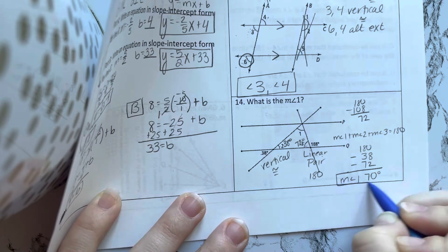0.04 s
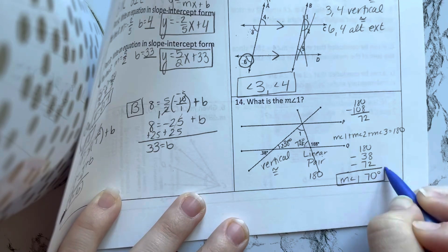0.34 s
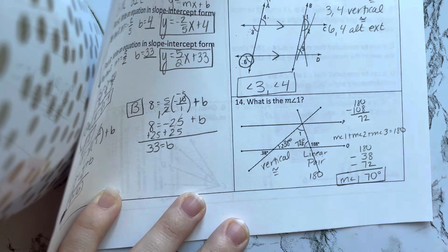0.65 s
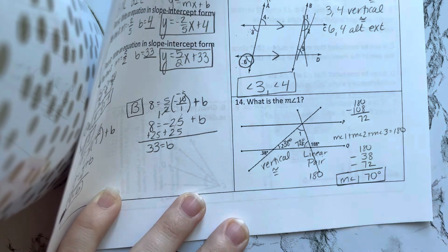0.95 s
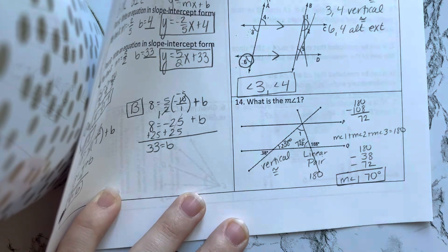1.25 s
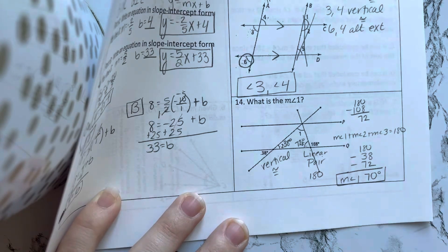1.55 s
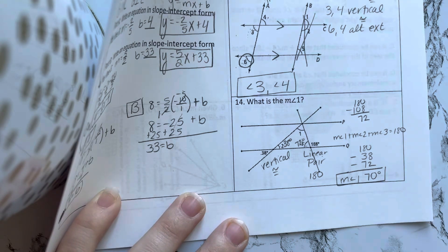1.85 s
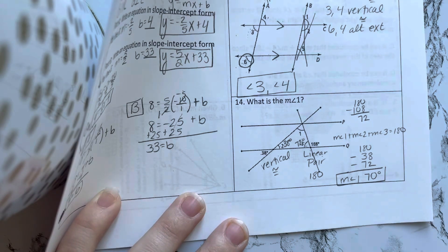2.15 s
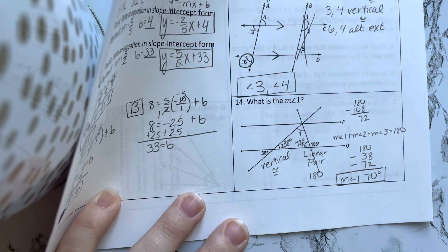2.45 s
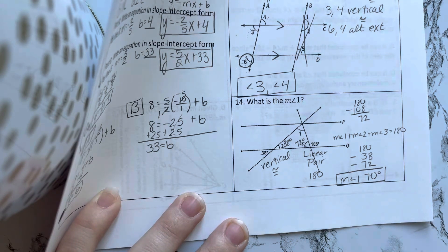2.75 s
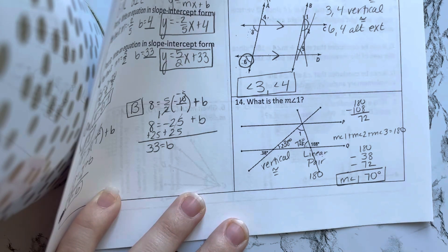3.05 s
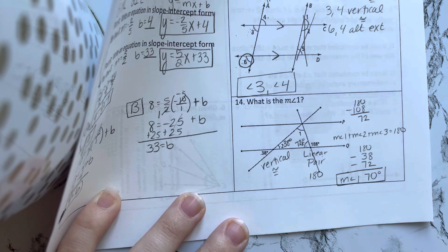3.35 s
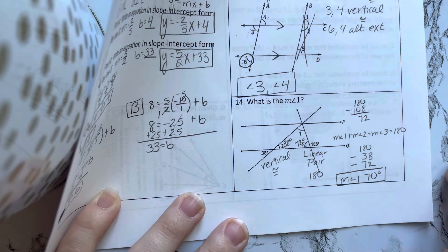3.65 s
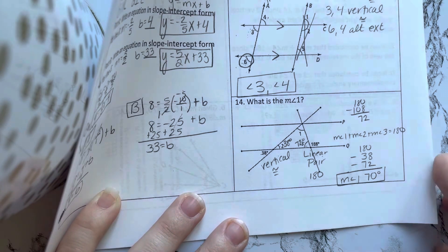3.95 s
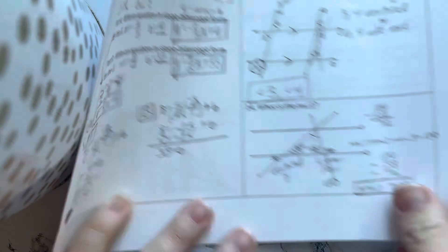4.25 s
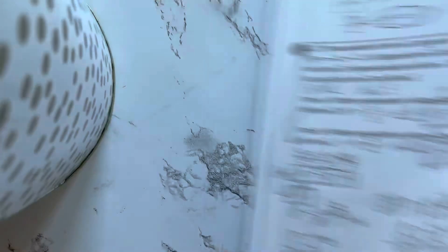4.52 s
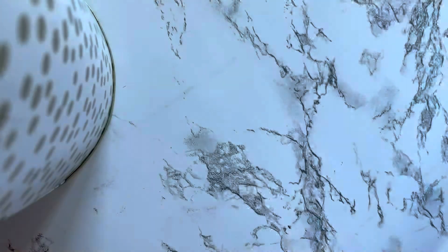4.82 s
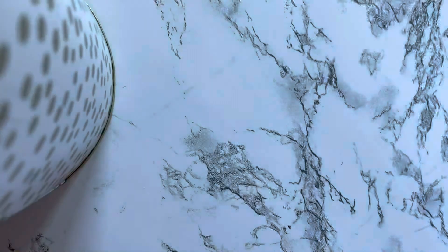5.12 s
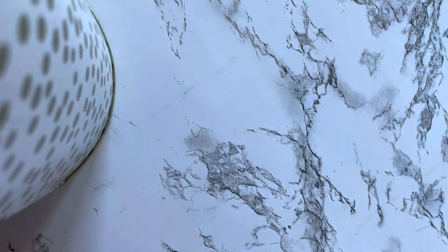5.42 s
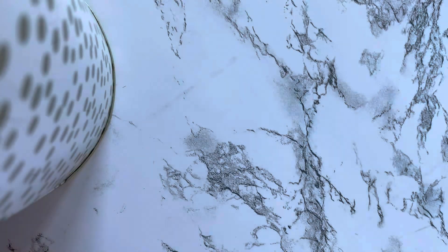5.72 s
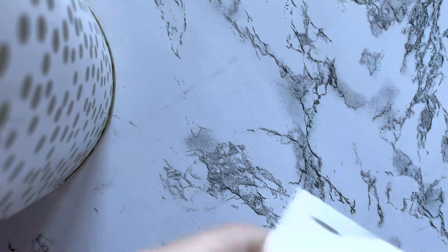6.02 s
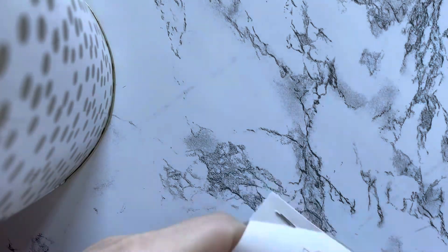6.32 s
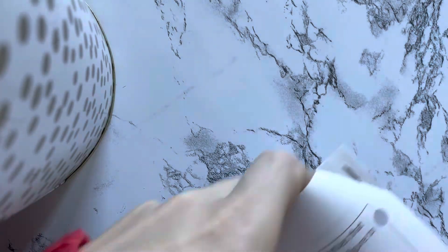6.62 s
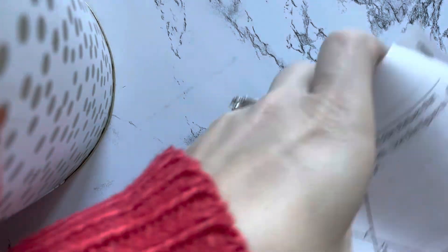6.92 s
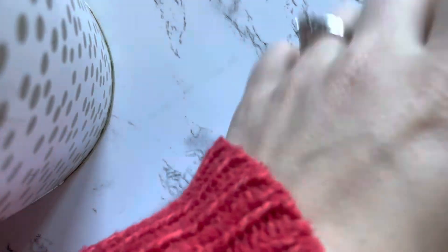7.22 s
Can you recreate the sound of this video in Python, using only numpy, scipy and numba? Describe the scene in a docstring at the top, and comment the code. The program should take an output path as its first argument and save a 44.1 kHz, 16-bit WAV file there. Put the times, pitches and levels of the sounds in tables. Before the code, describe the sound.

A pen makes two short, faint scratches on paper. Fingers then brush softly over the page, with a few tiny ticks. About halfway through, the sheet is slid off and turned over, rustling, flapping and crackling with soft puffs of air. It is pushed back across a stone table with a hiss and a brief low buzz, ending in a sharp snap. The sound is close, in a quiet room with a low rumble.

```python
"""Turning a worksheet on a stone table

A pen makes two last strokes and fingers brush faintly over the page: both are stick-slip friction.
The sheet is slid off, lifted, turned over and pushed back: it rubs, bends, buckles with sharp snaps
and displaces air. It is heard close by and in stereo, in a quiet room over a low rumble."""
import sys
import numpy as np
from scipy import signal
from scipy.fft import rfft, irfft, next_fast_len
from scipy.io import wavfile
from scipy.ndimage import uniform_filter1d
from numba import njit

SR = 44100
rng = np.random.default_rng(int(sys.argv[2]) if len(sys.argv) > 2 else 0)


def digitize_waveform(pressure):
    """Quantize a signal to 16-bit integers and store it at the path in sys.argv[1].

    Rows of a 2-D input are taken as channels; values are limited to [-1, 1].
    """
    field = np.atleast_2d(pressure).T
    bounded = np.clip(field, -1, 1)
    quanta = np.round(bounded * 32767).astype(np.int16)
    wavfile.write(sys.argv[1], SR, quanta)


N = 324983

# Buckles of the sheet. Each row: time in seconds, relative level in dB, crack and thud offsets in dB,
# relative level of the crumpling that follows in dB, its t60 in seconds, ring frequency in Hz.
BUCKLES = [(4.003, -40, -4.5, -33, -54, .08, 2120), (4.079, -33, -5, -21.5, -69, 0.18, 3500),
           (4.196, -31.5, -17, -31, -60, .08, 1940), (4.229, -22, -21, -26.5, -50, .2, 1800),
           (4.4664, -21.5, -9, -12, -37, 0.16, 2280), (4.496, -27.5, -17, -1, -35, 0.067, 950),
           (4.574, -29.5, -18, -19, -35.5, 0.092, 1140), (4.823, -45, -14, -22, -72, 0.025, 5230),
           (4.922, -50, -7, -10, -74, .05, 4770), (4.97, -29, -4.5, -4.5, -45.5, 0.18, 770),
           (5.044, -20.5, -17, -8, -47, .11, 1130), (5.082, -30, -4.5, -26, -58, .06, 2640),
           (5.11, -27, -32, -32, -28, 0.058, 2440), (5.157, -33, -18, -9, -66, 0.056, 1280),
           (5.219, -24, -8, -11, -41, 0.14, 1400), (5.24, -26.5, -30, -18, -48, .08, 1460),
           (5.298, -47, -5, -12, -64, .05, 2000), (5.373, -34, -9.5, -6, -47.5, 0.13, 1510),
           (5.412, -37, -33, -11, -40, 0.12, 1330), (5.5, -27, -32, -13.5, -35, 0.088, 1180),
           (5.538, -21, -32, -21, -35, 0.05, 1580), (5.566, -25.5, -32, -32, -42.5, 0.063, 1650),
           (5.605, -43, -33, -30, -39, .09, 1440), (5.757, -37.5, -30, -21, -40.5, 0.12, 2200),
           (5.831, -32, -22, -27, -41.5, .1, 1610), (5.895, -33, -13, -21, -45.5, 0.13, 2840),
           (5.912, -39.5, -3, -4.5, -53, 0.11, 2280), (5.984, -37.5, -8, -30, -40, 0.095, 1990),
           (6.049, -38.5, 0.5, -13, -39.5, 0.073, 1620), (6.265, -32.5, -26, -5.5, -39.5, 0.1, 1040),
           (6.554, -33, -25, -18, -48, .05, 2020), (6.567, -26, -27, -15.5, -41.5, 0.067, 1350),
           (6.613, -21, -33, -19, -35, 0.068, 2420), (6.665, -29.5, -12, -9.5, -45, 0.096, 1650),
           (6.833, -26, -31, -9.5, -49, 0.11, 2670), (6.892, -29, -16, -17, -38.5, 0.068, 1590),
           (7.013, -26, -24, -34, -49, 0.06, 1300), (7.135, -18.5, -10.5, -29, -33.5, 0.093, 1510),
           (7.176, -6, -11, -32, -43, 0.086, 1590), (7.197, -17.5, -29, -29, -52, 0.11, 1340)]
# Spectra of paper flexing, cracking and flapping. Each row: frequency in Hz, relative level in dB.
FLEX_SPECTRUM = [(250, -36.5), (450, -8.5), (700, 2.5), (1000, 0.5), (1400, 3.5), (1900, -7), (2600, -1.5),
                 (3300, -10), (5500, -26.5), (12000, -65)]
CRACK_SPECTRUM = [(1000, -12.5), (2300, 9), (4200, 13.5), (5600, 3), (8000, 8.5), (10500, 10), (12500, -9),
                  (15500, -10)]
FLAP_SPECTRUM = [(90, -0.5), (170, -1.5), (380, 0), (600, -4), (1100, -5.5)]


def buckling():
    """Snap-through releases elastic energy at once: a papery knock and ring, a crack and a low thud."""
    times, db, crack_db, thud_db, _, _, hz = np.transpose(BUCKLES)
    knock = colour(bursts(times, db + 6, after=0.085, t60=0.024), FLEX_SPECTRUM)
    ring = rings(times, db - 4, hz, width=700, after=0.16, t60=0.03)
    crack = colour(bursts(times, db + crack_db + 17.5, after=0.11, t60=0.012), CRACK_SPECTRUM)
    thud = colour(bursts(times, db + thud_db + 17, after=0.083, t60=0.21), FLAP_SPECTRUM)
    return knock + ring + crack + thud


def sliding():
    """Sliding friction hisses and crackles in short tugs and one long push, duller as the sheet recedes."""
    # Each row: start in seconds, length in seconds, relative level in dB, swish resonance in Hz.
    tugs = [(3.998, 0.12, -49, 3700), (4.04, 0.17, -51, 3380), (4.187, .15, -41, 3200),
            (4.296, 0.11, -46, 6800), (4.392, 0.078, -52.5, 4700), (4.463, 0.041, -42, 6250),
            (4.5, 0.12, -57, 2930), (4.58, 0.095, -51, 4560), (4.667, 0.096, -57, 3770),
            (4.715, 0.096, -51, 4900), (4.773, 0.2, -56.5, 6430), (4.96, 0.16, -53, 2450),
            (5.076, 0.13, -50.5, 3370), (5.197, 0.084, -50.5, 5600), (5.273, 0.16, -58, 3970),
            (6.245, 0.05, -45.5, 2700), (6.622, 0.071, -47, 3650), (6.895, 0.072, -45, 3760),
            (7.074, 0.045, -49, 2780), (7.111, 0.13, -43.5, 2580), (7.308, 0.11, -53, 2450)]
    # The push back across the table. Each row: time in seconds, relative level in dB.
    push = [(5.42, -82), (5.49, -61.5), (6.1, -50), (6.22, -52), (6.33, -57.5), (6.58, -54), (6.88, -48.5),
            (7.06, -58.5), (7.25, -57.5), (7.369, -54)]
    # Each row: frequency in Hz, relative level in dB.
    hiss_spectrum = [(600, -3.5), (900, -4), (1400, -2), (2100, 2), (3200, -1.5), (4500, -3), (5800, -4),
                     (7000, -2.5), (9300, 7.5), (11000, 3.5), (12000, 0.5), (13000, 6.5), (14300, -3),
                     (15500, -5)]
    # Each row: time in seconds, share of the hiss that is dulled, from 0 to 1.
    receding = [(4.3, 0.1), (4.5, 0.36), (6.5, 0.75)]
    friction = grains(5000, spread_db=0.5, clump_db=1.77, smooth=0.69)
    tugging = swish = 0
    for start, length, db, hz in tugs:
        tug = from_db(db) * stroke(start, length, skew=0.66, taper=1)
        tugging += tug
        swish += tug * rms_one(steep_band(friction, hz, width=hz / 1.77))
    motion = np.hypot(tugging, gains(push)[0])
    hiss = from_db(4.5) * colour(motion * friction, hiss_spectrum)
    crackles = colour(motion * grains(60, spread_db=4, clump_db=-1.5, smooth=0), CRACK_SPECTRUM)
    dulled = from_db(3) * signal.sosfiltfilt(signal.butter(2, 11500, fs=SR, output="sos"), hiss)
    away = in_time(receding)[0]
    return (1 - away) * hiss + away * dulled + from_db(-10) * swish + from_db(-9.5) * crackles


def bending():
    """Crumpling, in slow bends and after each buckle, excites the cavity of the curved sheet."""
    # Each row: start in seconds, length in seconds, relative level in dB, cavity resonance in Hz.
    slow_bends = [(4.198, 0.12, -47.5, 1800), (4.975, 0.12, -50.5, 1060), (5.073, 0.14, -36.5, 1440),
                  (5.349, 0.075, -51, 1210), (5.459, 0.25, -47, 1420), (5.68, 0.077, -41.5, 1340),
                  (6.065, 0.26, -50, 825), (6.228, 0.062, -47.5, 1124), (6.29, 0.52, -60.5, 1550),
                  (6.818, 0.16, -42.5, 1550), (7.222, 0.039, -39, 1500)]
    starts, lengths, db, bend_hz = np.transpose(slow_bends)
    times, _, _, _, fold_db, t60s, fold_hz = np.transpose(BUCKLES)
    bends = strokes(starts, lengths, from_db(db), skew=0.63, taper=1.21)
    folds = settling(times, from_db(fold_db), t60s)
    # The resonance follows an amplitude-weighted mean, so the strongest fold sets the pitch.
    weighted_bends = strokes(starts, lengths, from_db(db) * bend_hz, skew=0.63, taper=1.21)
    weighted_folds = settling(times, from_db(fold_db) * fold_hz, t60s)
    rest = 1e-6
    hz = (weighted_bends + weighted_folds + rest * np.median(fold_hz)) / (bends + folds + rest)
    hz *= np.exp(0.1 * drift(30) - 0.05)
    crumple = grains(1800, spread_db=4, clump_db=0.5, smooth=0.35)
    papery = evened(colour(crumple, FLEX_SPECTRUM), window_s=0.0099)
    hollow = (from_db(-1.5) * bends + folds) * cavity(crumple, hz, width=1130)
    return (from_db(-11.5) * bends + from_db(-2.5) * folds) * papery + hollow


def cavity(x, hz, width):
    """The hollow of a curved sheet acts as a gliding resonator; the output is held near unit rms."""
    turn = 2 * np.pi * hz / SR
    radius = np.exp(-np.pi * width / SR)
    rung = moving_band(moving_band(x, turn, radius), turn, radius)
    return evened(butterworth(rms_one(rung), 1, [500, 4500], "band"), window_s=0.0036)


def rustling():
    """Comb filtering: the moving sheet's sound interferes with its reflection from the table."""
    direct = sliding() + bending()
    n = np.arange(N)
    delay_s = 0.001193 * np.exp(0.449 * drift(2.797))
    reflection = np.interp(n - SR * delay_s, n, direct)
    return resonate(direct + 0.51 * reflection)


def swinging():
    """Air displacement: with each swing the leaf flutters and pushes out a low puff."""
    # Each row: start in seconds, length in seconds, flapping level in dB, puff level in dB.
    swings = [(4.039, 0.079, -53, -66), (4.144, 0.38, -58, -47), (4.367, 0.18, -54.5, -47),
              (4.463, 0.26, -44.5, -43.5), (4.76, 0.11, -52, -51), (4.972, 0.083, -37, -37),
              (5.053, 0.1, -38, -54), (5.125, 0.15, -40.5, -66), (5.317, 0.26, -45, -58),
              (5.51, 0.24, -45.5, -54), (5.647, 0.3, -46, -45.5), (5.918, 0.55, -49.5, -52),
              (6.235, 0.063, -49.5, -42), (6.257, 0.26, -85, -37), (6.483, 0.11, -50.5, -39.5),
              (6.643, 0.1, -71, -42.5), (6.797, 0.35, -51.5, -47), (7.105, 0.23, -41.5, -43)]
    # Each row: frequency in Hz, relative level in dB.
    air_spectrum = [(20, -26), (50, 0.5), (110, -6), (190, -19), (400, -42)]
    starts, lengths, flap_db, air_db = np.transpose(swings)
    flap, air = (strokes(starts, lengths, from_db(db), skew=0.66, taper=1) for db in (flap_db, air_db))
    flutter = colour(flap * grains(500, spread_db=2, clump_db=3.5, smooth=0.43), FLAP_SPECTRUM)
    return flutter + colour(air * rng.standard_normal(N), air_spectrum)


def clink(start_s=4.467):
    """Modal ringing: something small and hard is knocked as the sheet leaves."""
    # Each row: frequency in Hz, initial level in dB, t60 in seconds.
    modes = [(2230, -26.5, 0.024), (6800, -17.5, 0.015), (7570, -27, 0.022), (10670, -20, 0.011),
             (13900, -26, .015)]
    t = np.maximum(np.arange(N) / SR - start_s, 0)
    return sum(from_db(db - 60 * np.minimum(t / t60, 5)) * np.sin(2 * np.pi * hz * t)
               for hz, db, t60 in modes)


def buzz():
    """A fundamental and its octave shudder briefly, as of something rubbing on the table."""
    # Each row: time in seconds, fundamental in Hz, level in dB.
    shudder = [(6.0, 96.2, -80), (6.04, 103.3, -51), (6.08, 100.6, -41), (6.16, 100.8, -37.5),
               (6.22, 102.4, -43), (6.27, 100, -68)]
    hz = in_time(shudder)[0] * (1 + 0.0129 * drift(24.6))
    phase = 2 * np.pi * np.cumsum(hz) / SR
    return gains(shudder)[1] * (1.04 * np.sin(phase) + 1.03 * np.sin(2 * phase))


def pen():
    """Roughness noise: the ball point drags over the grain of the paper."""
    # Each row: start in seconds, length in seconds, level in dB.
    pen_strokes = [(-0.03, 0.13, -47.5), (0.175, 0.13, -50.5)]
    # Each row: frequency in Hz, relative level in dB.
    pen_spectrum = [(170, 10.5), (330, -5.5), (600, -8.5), (850, -1), (1200, -5.5), (1700, -2.5),
                    (2600, -8), (3600, -9), (5500, -14), (7000, -7.5), (9000, -0.5), (11000, -3.5),
                    (13000, -8), (15500, -12)]
    starts, lengths, db = np.transpose(pen_strokes)
    pressure = strokes(starts, lengths, from_db(db), skew=0.67, taper=1.2)
    return colour(pressure * grains(5000, spread_db=2, clump_db=0, smooth=0.82), pen_spectrum)


def brushing():
    """Friction noise grows with finger speed: a soft rub, high sheen and hollow ring, with stray ticks."""
    # Each row: start and length in seconds, levels of rub, sheen and ring in dB, ring frequency in Hz.
    rubs = [(0.354, 0.13, -78, -66.5, -78.5, 3400), (0.441, 0.16, -69, -67.5, -74, 2370),
            (0.55, 0.36, -70.5, -71, -76.5, 582), (0.732, 0.14, -101, -68.5, -79, 2560),
            (0.838, 0.24, -84, -75, -96, 2360), (1.063, 0.051, -73, -73, -79, 570),
            (1.257, 0.1, -84, -76.5, -84, 1970), (2.083, 0.12, -78, -82, -86, 1890),
            (2.207, 0.1, -65, -64, -82, 1770), (2.31, 0.084, -61.5, -57, -84, 2110),
            (2.409, 0.13, -64.5, -61, -77, 1890), (2.532, 0.11, -73.5, -64.5, -77, 2230),
            (2.618, 0.15, -70.5, -71, -75, 1250), (2.705, 0.25, -83, -92, -89, 1490),
            (2.917, 0.06, -88, -77, -84, 6500), (3.043, 0.25, -92, -65, -96, 4200),
            (3.243, 0.17, -82, -72, -88, 3060), (3.271, .022, -87, -68, -74, 3280),
            (3.399, 0.22, -75.5, -76, -96, 686), (3.83, 0.17, -87, -78, -93, 2290),
            (3.95, 0.048, -77, -73, -74, 7050)]
    # Each row: time in seconds, relative level in dB, ring frequency in Hz.
    page_ticks = [(0.415, -56, 3330), (0.5164, -47.5, 10000), (0.5937, -55, 11000), (0.858, -52.5, 11250),
                  (2.67, -55, 1460), (3.274, -53, 3200), (3.858, -62, 9700)]
    # Each row of both spectra: frequency in Hz, relative level in dB.
    rub_spectrum = [(300, 4), (500, 3.5), (800, 3.5), (1200, -4), (1800, -3), (2500, 1.5), (3100, -13),
                    (4400, -12), (5500, -17.5), (8000, -23)]
    sheen_spectrum = [(3000, -30), (5500, -19.5), (7500, 2.5), (10000, 11), (13000, 5.5), (15500, -2)]
    friction = grains(4000, spread_db=2.5, clump_db=2, smooth=1)
    rub = sheen = ring = 0
    for start, length, rub_db, sheen_db, ring_db, hz in rubs:
        speed = stroke(start, length, skew=0.65, taper=1.5)
        rub += from_db(rub_db) * speed
        sheen += from_db(sheen_db) * speed
        ring += from_db(ring_db) * speed * rms_one(steep_band(friction, hz, width=hz / 3.5))
    times, db, hz = np.transpose(page_ticks)
    clicks = colour(bursts(times, db + 16.5, after=0.06, t60=0.008), sheen_spectrum)
    ticks = clicks + rings(times, db - 0.5, hz, width=1100, after=0.5, t60=0.012)
    return colour(rub * friction, rub_spectrum) + colour(sheen * friction, sheen_spectrum) + ring + ticks


def hand_bumps():
    """A soft impact carries little treble: flesh meets paper and stone with a dull thud."""
    # Each row: time in seconds, relative level in dB, ring frequency in Hz.
    bumps = [(1.077, -61, 560), (3.436, -55, 565)]
    times, db, hz = np.transpose(bumps)
    return butterworth(rings(times, db, hz, width=490, after=0.37, t60=0.058), 2, 1300)


def resonate(x):
    """Resonances of the sheet and table top lift narrow bands out of a broad sound."""
    # Each row: frequency in Hz, bandwidth in Hz, gain of the added band in dB.
    resonances = [(806, 530, -4.5), (3650, 125, -2.5), (4670, 180, -2.5), (6710, 330, -11.5)]
    return x + sum(from_db(db) * band(x, hz, width) for hz, width, db in resonances)


def placed(x):
    """Stereo placement: the sound sits to the right; the channels' phase difference varies with frequency."""
    # Each row: frequency in Hz, left minus right phase in radians.
    phase_difference = [(60, 0), (330, -.45), (520, -1.2), (720, -2.7), (1100, -3.1), (1600, -4.9),
                        (2300, -6.3), (3100, -7.4), (4200, -6.9), (7150, -6.8), (7750, -3.4), (8800, -2.9),
                        (10500, -.1), (11500, .2), (12600, 2.9), (13700, 3.3), (14700, 6.2)]
    # Each row: frequency in Hz, left minus right level in dB.
    balance = [(60, -2), (380, -4), (750, -9), (1300, -8.5), (2200, -5.5), (3400, -7.5), (5000, -7),
               (7300, -6), (7700, 0)]
    size = next_fast_len(N + SR // 10)
    hz = np.arange(size // 2 + 1) * SR / size
    left = from_db(at_hz(balance, hz) / 2) * np.exp(0.5j * at_hz(phase_difference, hz))
    return irfft(rfft(x, size) * np.array([left, 1 / left]), size)[:, :N]


def passing(stereo, below_hz):
    """Level follows source position: the sheet's lower tones rise and fall in the left channel."""
    # Each row: time in seconds, gain of the left side's lower tones in dB.
    left_gain = [(2.3, 5.5), (4.2, 7), (4.55, -0.5), (5.15, 3), (5.5, 3), (5.9, -3.5), (6.2, -0.5),
                 (6.8, 0.5), (7.2, -12)]
    left, right = stereo
    lows = butterworth(left, 1, below_hz)
    return np.array([left + lows * (from_db(in_time(left_gain)[0]) - 1), right])


def room(x, t60, wall_hz, onset_s):
    """Diffuse reverberation: dull reflections build up and decay exponentially, unlike on each side."""
    t = np.arange(SR // 2) / SR
    tail = rng.standard_normal((2, len(t))) * from_db(-60 * t / t60) * np.minimum(t / onset_s, 1)
    tail = butterworth(tail / np.linalg.norm(tail[0]), 2, wall_hz)
    return signal.fftconvolve(x[None], tail, axes=1)[:, :N]


def background():
    """Room rumble, coherent between the channels in the deepest bass, with faint mains hum."""
    # Each row: frequency in Hz, relative level in dB.
    rumble_spectrum = [(22, -16), (35, -8), (50, -1), (70, 1), (95, -7.5), (130, -6.5), (180, -13),
                       (260, -23), (400, -31), (700, -47.5), (1500, -53), (4000, -59), (8500, -66),
                       (10800, -58.5), (13000, -69), (15000, -80)]
    mid, side = (colour(rng.standard_normal(N), rumble_spectrum) for _ in range(2))
    side = butterworth(side, 2, 90, "high") * np.array([[1], [-1]])
    hum = from_db(-56) * np.sin(2 * np.pi * 120 * np.arange(N) / SR)
    return from_db(-51.5) * mid + from_db(-57.5) * side + hum


def grains(per_s, spread_db, clump_db, smooth):
    """Stick-slip: fibres catch and let go in clumps of uneven clicks over smooth noise; unit rms."""
    sizes = from_db(spread_db * np.minimum(rng.exponential(1, N), 4)) * rng.choice([-1, 1], N)
    clicks = rms_one(sizes * (rng.random(N) < per_s / SR))
    friction = clicks + smooth * rng.standard_normal(N)
    return rms_one(friction * from_db(clump_db * drift(53)))


def burst(after, t60):
    """A unit impulse and an exponentially dying flurry of noise that starts at amplitude `after`."""
    t = np.arange(SR // 8) / SR
    return (t == 0) + after * from_db(-60 * t / t60) * rng.standard_normal(len(t))


def bursts(times, levels_db, after, t60):
    """Impulsive excitation: one burst for each event."""
    return superpose(times, [from_db(db) * burst(after, t60) for db in levels_db])


def rings(times, levels_db, pitches, width, after, t60):
    """Each burst rings a small patch of paper at its own resonance; the levels are peak values."""
    rung = [steep_band(burst(after, t60), hz, width) for hz in pitches]
    return superpose(times, [from_db(db) * x / np.abs(x).max() for db, x in zip(levels_db, rung)])


def settling(times, heights, t60s, attack_s=0.0048):
    """Relaxation envelope: after each buckle the crumpling rises quickly and decays exponentially."""
    t = np.arange(SR // 3) / SR
    rise = np.minimum(t / attack_s, 1)
    return superpose(times, [h * rise * from_db(-60 * t / t60) for h, t60 in zip(heights, t60s)])


def superpose(times, events):
    """Linear superposition of short signals, each from its start in seconds."""
    out = np.zeros(N + SR)
    for start, event in zip(times, events):
        out[int(start * SR):][:len(event)] += event
    return out[:N]


def stroke(start, length, skew, taper):
    """The envelope of one hand movement is an arch; a skew under 1 brings its top early."""
    out = np.zeros(N)
    n = np.arange(max(int(start * SR), 0), min(int((start + length) * SR), N))
    progress = np.clip((n / SR - start) / length, 0, 1)
    out[n] = np.abs(np.sin(np.pi * progress ** skew)) ** taper
    return out


def strokes(starts, lengths, heights, skew, taper):
    """The summed envelope of a series of movements."""
    return sum(h * stroke(s, length, skew, taper) for s, length, h in zip(starts, lengths, heights))


def drift(rate):
    """Slow random modulation: low-passed noise of unit rms, with its corner at `rate` Hz."""
    step, warm_up = 40, 2000
    r = np.exp(-2 * np.pi * step * rate / SR)
    noise = rng.standard_normal(N // step + warm_up + 2)
    slow = signal.lfilter([1], [1, -2 * r, r * r], noise)[warm_up:]
    return np.interp(np.arange(N) / step, np.arange(len(slow)), rms_one(slow))


def colour(x, spectrum, size=8192):
    """A minimum-phase filter of unit energy imposes a spectrum, falling away beyond its ends."""
    hz = np.arange(size // 2 + 1) * SR / size
    (low, low_db), (high, high_db) = spectrum[0], spectrum[-1]
    skirted = [(low / 4, low_db - 30), *spectrum, (high * 4, high_db - 30)]
    cepstrum = irfft(np.log(from_db(at_hz(skirted, hz))))
    cepstrum[size // 2:] = 0
    response = irfft(np.exp(2 * rfft(cepstrum)))
    return signal.fftconvolve(x, response / np.linalg.norm(response))[:N]


def band(x, hz, width):
    """A two-pole resonator with unit peak gain and a bandwidth in Hz."""
    r = np.exp(-np.pi * width / SR)
    feedback = [1, -2 * r * np.cos(2 * np.pi * hz / SR), r * r]
    return (1 - r * r) / 2 * signal.lfilter([1, 0, -1], feedback, x + 1e-18)


def steep_band(x, hz, width):
    """Two equal resonators in cascade give steeper flanks."""
    return band(band(x, hz, width), hz, width)


@njit
def moving_band(x, turn, radius):
    """A damped resonator whose centre, `turn` in radians per sample, glides."""
    out, state = np.zeros(len(x)), 0j
    for i in range(len(x)):
        state = radius * np.exp(1j * turn[i]) * state + x[i]
        out[i] = state.real
    return out


def butterworth(x, order, hz, kind="low"):
    """A filter with a maximally flat passband."""
    return signal.sosfilt(signal.butter(order, hz, kind, fs=SR, output="sos"), x)


def evened(x, window_s):
    """Division by the running rms keeps the grain of a sound but steadies its level; unit rms."""
    power = uniform_filter1d(x * x, int(window_s * SR))
    return rms_one(x / np.sqrt(np.abs(power) + 1e-12))


def from_db(db):
    """Decibels to amplitude ratio."""
    return 10 ** (np.asarray(db) / 20)


def rms_one(x):
    """Scale to unit rms."""
    return x / np.sqrt(np.mean(x ** 2) + 1e-20)


def in_time(rows):
    """Interpolate each column after the time column, sample by sample."""
    times, *columns = np.transpose(rows)
    return [np.interp(np.arange(N) / SR, times, column) for column in columns]


def gains(rows):
    """Gain curves from dB columns, silent outside their span."""
    t = np.arange(N) / SR
    return from_db(in_time(rows)) * ((t >= rows[0][0]) & (t <= rows[-1][0]))


def at_hz(points, hz):
    """Interpolate a table on a log-frequency axis."""
    frequencies, values = np.transpose(points)
    return np.interp(np.log(hz + 1), np.log(frequencies), values)


def scene():
    """Direct and reflected sound add; a second, duller rustle, inverted on one side, widens the sound."""
    rustle = rustling()
    wide_rustle = from_db(-6.5) * butterworth(rustling(), 4, 4200)
    touches = resonate(pen() + brushing() + buckling() + hand_bumps()) + clink()
    early = room(touches, t60=0.015, wall_hz=4400, onset_s=0.0054)
    late = room(rustle + touches, t60=0.24, wall_hz=3200, onset_s=0.014)
    stereo = placed(rustle + touches + swinging()) + placed(wide_rustle) * np.array([[1], [-1]])
    direct = passing(stereo, below_hz=790) + buzz()
    return from_db(-4) * direct + from_db(-8) * early + from_db(-14) * late + background()


def record(dry, cutoff_hz=15750):
    """Band limiting: a steep elliptic low-pass removes the highest treble."""
    return signal.sosfilt(signal.ellip(10, 0.1, 70, cutoff_hz, fs=SR, output="sos"), dry)


dry = scene()
out = record(dry)
digitize_waveform(out)
```